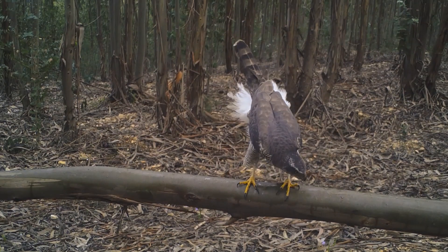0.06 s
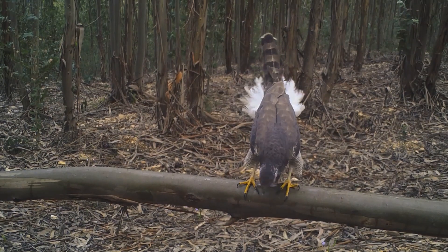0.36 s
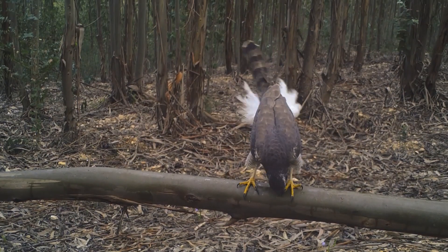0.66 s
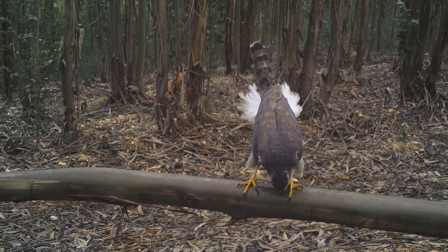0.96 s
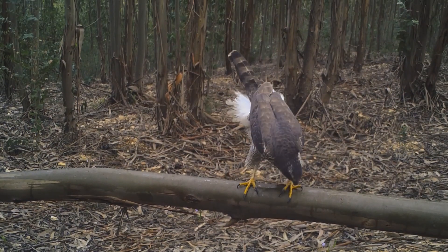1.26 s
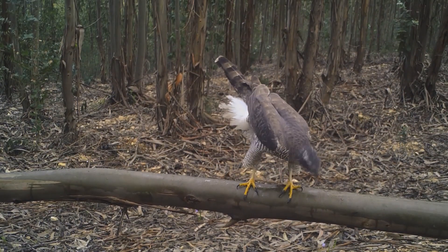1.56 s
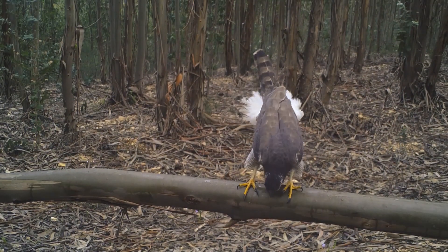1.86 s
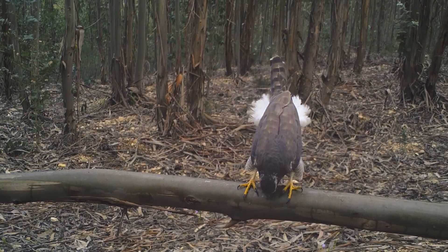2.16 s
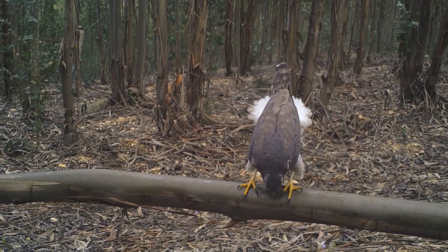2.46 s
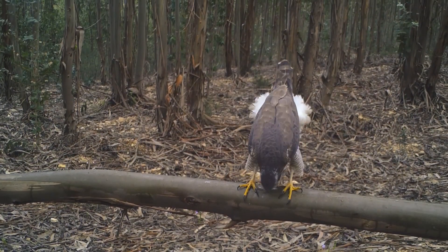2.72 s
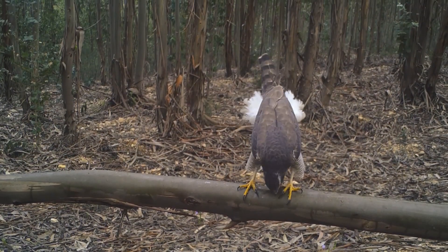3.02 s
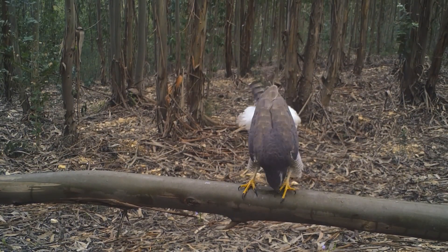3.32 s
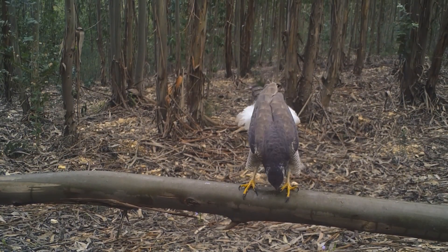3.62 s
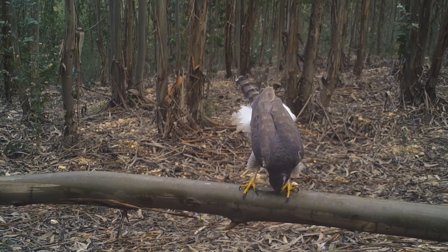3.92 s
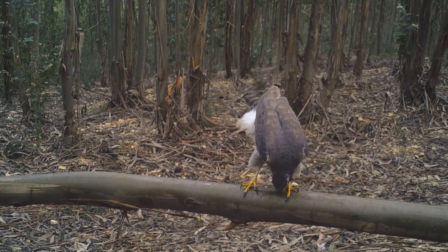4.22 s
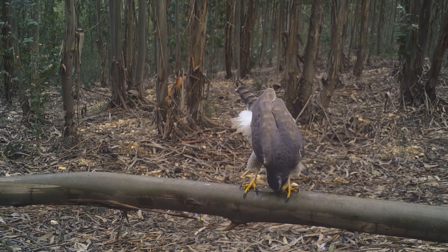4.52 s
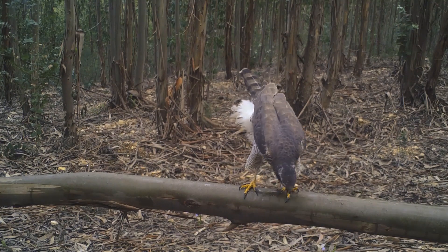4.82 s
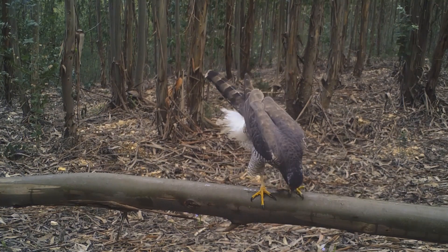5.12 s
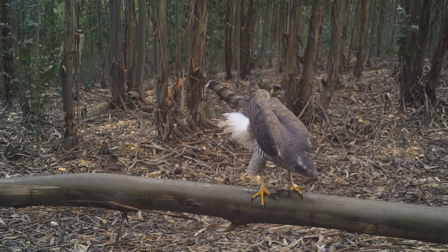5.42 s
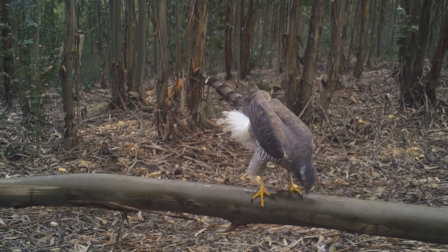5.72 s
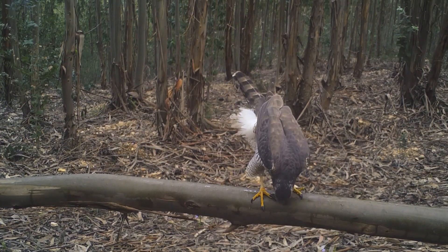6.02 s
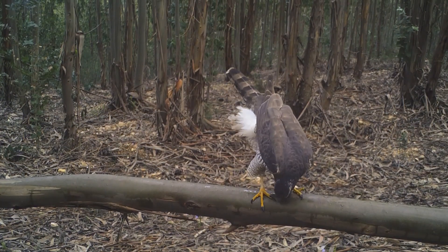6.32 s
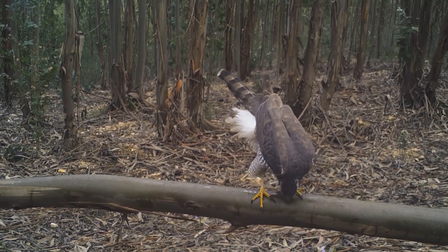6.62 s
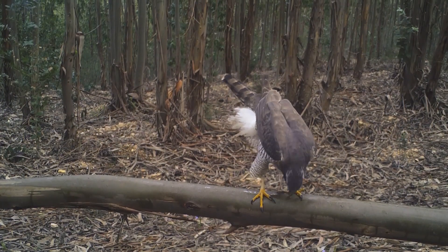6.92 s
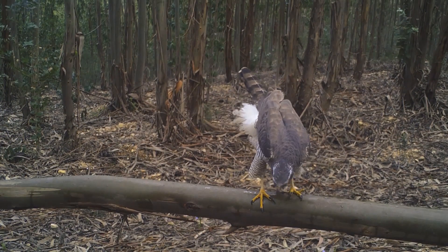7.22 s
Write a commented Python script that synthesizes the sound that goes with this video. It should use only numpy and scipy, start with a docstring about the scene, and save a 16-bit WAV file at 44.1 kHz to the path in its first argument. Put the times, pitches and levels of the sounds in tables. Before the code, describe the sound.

Shrill rising hawk calls, one cracking, give way to soft, widely spaced chirps and light leaf ticks in quiet woodland.

```python
"""A goshawk calls in a wood: drawn-out rising wails, one cracking into two pitches, and short falling notes.
Its syrinx makes a stack of harmonics, filtered by the resonances of throat and beak.
Trunks reflect the voice and the wood rings faintly. Dry leaf litter ticks and a small bird
whistles far off, over a low outdoor rumble and a faint hiss."""
import sys
import numpy as np
from scipy import signal
from scipy.fft import rfft, irfft
from scipy.io import wavfile

SR = 44100
rng = np.random.default_rng(int(sys.argv[2]) if len(sys.argv) > 2 else 0)


def bounce(signal):
    """Save signal as a 16-bit WAV file at the path given by the first command-line argument."""
    frames = np.transpose(np.atleast_2d(signal))
    limited = np.clip(frames, -1, 1)
    pcm = np.round(limited * 32767).astype(np.int16)
    wavfile.write(sys.argv[1], SR, pcm)


N = 325017
LEAD = SR // 4   # samples ahead of time zero, where the first wail begins


def from_db(db):
    """Amplitude ratio of a level in decibels."""
    return 10 ** (np.asarray(db) / 20)


def rms_one(x):
    """Normalisation to unit rms."""
    return x / np.sqrt(np.mean(x ** 2) + 1e-20)


def at_hz(spectrum, hz):
    """Interpolation of a spectrum on a logarithmic frequency axis."""
    points_hz, db = np.transpose(spectrum)
    return np.interp(np.log(np.maximum(hz, 1)), np.log(points_hz), db)


def resonance(hz, centre_hz, half_width_hz):
    """Lorentzian resonance curve of unit height."""
    return 1 / (1 + ((hz - centre_hz) / half_width_hz) ** 2)


def coloured_noise(spectrum, size):
    """Spectral shaping of white noise, at unit rms."""
    hz = np.arange(size // 2 + 1) * SR / size
    return rms_one(irfft(rfft(rng.standard_normal(size)) * from_db(at_hz(spectrum, hz)), size))


def waver(hz, size):
    """Random modulation: low-passed noise of unit rms."""
    low_pass = signal.butter(2, hz, fs=SR, output="sos")
    return rms_one(signal.sosfilt(low_pass, rng.standard_normal(size + SR // 2)))[-size:]


def phase_of(hz):
    """Phase in radians is the integral of angular frequency."""
    return 2 * np.pi * np.cumsum(hz) / SR


def follow(rows):
    """Linear interpolation of timed rows: sample indices, a 2 ms fade at each end, and the curves."""
    s, *columns = np.transpose(rows)
    at = np.arange(int(s[0] * SR), int(s[-1] * SR))
    fade = np.minimum(np.minimum(at - at[0], at[-1] - at) / (.002 * SR), 1)
    return at, fade, [np.interp(at / SR, s, column) for column in columns]


def place(sound, at):
    """A sound set on the time line at the given samples."""
    out = np.zeros(LEAD + N)
    out[LEAD + at] = sound
    return out


def outdoor_air(level_db=-50.5):
    """Stationary noise whose density falls from a low rumble to a faint hiss."""
    # Each row: frequency in Hz, relative spectral density in dB.
    spectrum = [(8.8, -24), (15, 2.5), (30, -2.5), (101, -12), (189, -17.5), (343, -23.5), (385, -25),
                (497, -27.5), (741, -31.5), (1130, -36), (1430, -38.5), (1950, -40.5), (2310, -41),
                (3070, -45), (13500, -53.5)]
    return from_db(level_db) * coloured_noise(spectrum, N)


def wood_echo(x, tail_db=-27.5, t60_s=0.71, dull_hz=9060, build_s=0.026):
    """Convolution with reflections from ground and trunks and a decaying tail of diffuse scatter."""
    # Each row: delay in seconds, gain in dB.
    reflections = [(.0031, -21), (0.0102, -13), (.034, -25.5), (0.057, -29.5), (0.074, -40), (0.107, -39)]
    t = np.arange(SR) / SR
    scatter = signal.sosfilt(signal.butter(2, dull_hz, fs=SR, output="sos"), rng.standard_normal(SR))
    scatter *= from_db(-60 * t / t60_s) * (1 - np.exp(-t / build_s))
    response = from_db(tail_db) * scatter / np.sqrt(np.sum(scatter ** 2))
    for delay_s, db in reflections:
        response[int(delay_s * SR)] += from_db(db)
    return signal.fftconvolve(x, response)[:len(x)]


def far_bird(jitter=0.0049, jitter_hz=60):
    """A thin whistle: a sinusoid under slight random frequency modulation."""
    # Each row: time in seconds, pitch in Hz, level in dB.
    whistle = [(5.295, 4500, -76), (5.315, 4420, -79), (5.355, 4480, -72), (5.39, 4460, -88),
               (5.47, 4390, -78), (5.54, 4530, -90)]
    at, fade, (pitch, level_db) = follow(whistle)
    tone = np.sqrt(2) * np.sin(phase_of(pitch * (1 + jitter * waver(jitter_hz, len(at)))))
    return place(tone * fade * from_db(level_db), at)


def leaf_litter(snap_s=0.00029, crumble_s=0.0088, crumble_db=-18):
    """Impulsive excitation: a dry snap and a brief crumble drive two heavily damped modes."""
    # Each row: start in seconds, peak level in dB, gain of the crunch mode in dB.
    ticks = [(1.209, -47.5, -2), (1.7754, -42, -8), (2.291, -54.5, -0.5), (3.063, -55.5, 8),
             (3.2577, -53, 12), (3.3013, -53, 8.5), (4.182, -43.5, -8), (4.4455, -47, -8), (6.12, -53, -2)]
    # Each row: frequency in Hz, bandwidth in Hz. The low crunch comes first, then the snap.
    modes = [(1900, 1900), (6700, 1400)]
    resonators = [signal.iirpeak(hz, hz / width, fs=SR) for hz, width in modes]
    t, out = np.arange(SR // 20) / SR, 0
    envelope = np.exp(-t / snap_s) + from_db(crumble_db) * np.exp(-t / crumble_s)
    for start, peak_db, crunch_db in ticks:
        force = rng.standard_normal(len(t)) * envelope
        crunch, snap = [signal.lfilter(b, a, signal.lfilter(b, a, force)) for b, a in resonators]
        tick = snap + from_db(crunch_db) * crunch
        out += place(from_db(peak_db) * tick / np.abs(tick).max(), int(start * SR) + np.arange(len(t)))
    return out


def rasp(phase):
    """Turbulence noise, coloured by the throat and amplitude-modulated once a cycle."""
    # Each row: frequency in Hz, relative spectral density in dB.
    spectrum = [(500, -33), (1500, -29), (2500, -9), (3700, 6), (5200, 5.5), (8000, -3.5), (13000, -38)]
    return coloured_noise(spectrum, len(phase)) * (1 + 0.72 * np.cos(phase))


def hawk_voice(rows, throat, flutter_db, flutter_hz, shrill_hz, shrill_half_width_hz,
               jitter=0.071, shimmer=0.21, rough_hz=500, rasp_db=-11.5, wobble=.003, wobble_db=0.76):
    """Source and filter: harmonics of the syrinx, weighted by the resonances of throat and beak."""
    at, fade, (pitch, level_db, beak_hz, bright_db, shrill_db, rough) = follow(rows)
    rough, size = np.clip(rough, 0, 1), len(at)
    # unsteady air pressure moves pitch and level together
    pressure = waver(40, size)
    pitch, level_db = pitch * (1 + wobble * pressure), level_db + wobble_db * pressure
    phase = phase_of(pitch * (1 + jitter * rough * waver(rough_hz, size)))
    k = np.arange(1, 15)[:, None]   # harmonic numbers
    hz = k * pitch
    # brightness tilts the first two octaves of the stack
    colour_db = at_hz(throat, hz) + bright_db * np.minimum(np.log2(k), 2)
    # the beak sets one resonance and opens or shades a shrill one above it
    colour_db += 10 * resonance(hz, beak_hz, half_width_hz=600)
    colour_db += shrill_db * resonance(hz, shrill_hz, shrill_half_width_hz)
    # short wavelengths flutter most as the head moves
    colour_db += flutter_db * np.minimum(hz / 4000, 2) * np.array([waver(flutter_hz, size) for _ in k])
    gains = from_db(colour_db)
    lags = rng.uniform(0, 2 * np.pi, k.shape)
    tone = np.sum(gains * np.cos(k * phase - lags), axis=0) / np.sqrt(np.sum(gains ** 2, axis=0) / 2)
    voice = tone * (1 + shimmer * rough * waver(rough_hz, size)) + from_db(rasp_db) * rough * rasp(phase)
    return place(voice * fade * from_db(level_db), at)


def hawk_notes(top_s=0.0097, slide_s=.028, release_s=0.014, edge_db=14):
    """Downward frequency glides: after a bright onset each note sags, dulls and roughens."""
    # Each row: start, attack and length in seconds, top and end pitch in Hz, base level in dB, beak
    # resonance in Hz, then base values of brightness in dB per octave, shrillness in dB, roughness 0-1.
    notes = [(0.528, .004, 0.049, 951, 812, -39, 2850, -1.5, -4, .18),
             (3.631, 0.018, 0.058, 958, 808, -39, 2380, -0.5, -6, 0.02),
             (5.101, .004, 0.05, 964, 824, -38.5, 2940, 0.4, 0, 0.06),
             (6.486, 0.0043, 0.053, 1004, 831, -36.5, 2670, 0, 1.5, .08)]
    # Each row: frequency in Hz, relative gain of the throat in dB.
    throat = [(800, -3), (1000, -12), (1250, -8), (1900, 2), (2400, 12.5), (3000, -4), (3600, -0.5),
              (4200, -11.5), (4900, -4.5), (5900, -27), (7000, -23.5), (8500, -40.5), (10500, -33.5),
              (12500, -40)]
    # Offsets to level, brightness, shrillness and roughness at the two ends of the slide.
    at_top, at_end = (-1, 1.5, 5.5, 0), (-5, -6.5, -7.5, 0.23)
    out = 0
    for start, attack_s, length_s, top_hz, end_hz, level_db, beak_hz, bright_db, shrill_db, rough in notes:
        t = np.linspace(0, length_s + release_s, 200)
        slide = 1 - np.exp(-((t - top_s) / slide_s) ** 2)
        edges = np.maximum(1 - t / attack_s, 0) + np.maximum(t - length_s, 0) / release_s
        sag_db, tilt_db, shade_db, husk = [top + (end - top) * slide for top, end in zip(at_top, at_end)]
        pitch = top_hz + (end_hz - top_hz) * slide
        envelope_db = level_db + sag_db - edge_db * edges
        timbre = beak_hz, bright_db + tilt_db, shrill_db + shade_db, rough + husk
        rows = np.column_stack(np.broadcast_arrays(start + t, pitch, envelope_db, *timbre))
        out += hawk_voice(rows, throat, flutter_db=3, flutter_hz=55.6,
                          shrill_hz=5000, shrill_half_width_hz=900)
    return out


def hawk_crack(lower_jitter=0.076, upper_jitter=.012, rough_hz=300, shimmer=.4, rasp_db=-17):
    """Biphonation: the two sides of the syrinx fall out of step and make sum and difference tones."""
    # Each row: time in seconds, lower and upper pitch in Hz, level in dB.
    contour = [(.412, 1240, 2350, -39.5), (.417, 1318, 2259, -29), (.432, 1385, 2301, -31.5),
               (.456, 1346, 2244, -30.5), (.467, 1376, 2200, -38), (.472, 1305, 2200, -43)]
    # Each row: multiple of the lower pitch, multiple of the upper pitch; their sum is one tone.
    multiples = [(1, 0), (0, 1), (2, 0), (-1, 2), (1, 1), (0, 2), (2, 1), (-1, 3), (1, 2), (0, 3), (1, 3),
                 (0, 4), (2, 3), (1, 4)]
    # Each entry: relative level of the matching tone in dB.
    tone_db = [-14, 3, -15, -11, -1.5, -8.5, -13, -29, -20, -22.5, -28.5, -31, -39, -26]
    at, fade, (lower_hz, upper_hz, level_db) = follow(contour)
    size = len(at)
    lower = phase_of(lower_hz * (1 + lower_jitter * waver(rough_hz, size)))
    upper = phase_of(upper_hz * (1 + upper_jitter * waver(rough_hz, size)))
    tones = 0
    for (m, n), db in zip(multiples, tone_db):
        flicker = 1 + shimmer * abs(m) * waver(rough_hz, size)
        tones += from_db(db) * np.cos(m * lower + n * upper) * flicker
    voice = rms_one(tones) + from_db(rasp_db) * rasp(upper)
    return place(voice * fade * from_db(level_db), at)


def wail_timbre(s, pitch, level_db, beak_hz, bright_db, shrill_db, rough,
                full_voice_db=-38.5, shrill_pivot_db=-29):
    """Level-dependent timbre: a wail is dull when soft, shrill when loud."""
    soft_db = np.maximum(full_voice_db - level_db, 0)
    bright_db = bright_db - 0.27 * soft_db
    shrill_db = shrill_db + 2.04 * (level_db - shrill_pivot_db)
    rough = rough * from_db(0.1 * soft_db)
    return np.column_stack(np.broadcast_arrays(s, pitch, level_db, beak_hz, bright_db, shrill_db, rough))


def wail_arch(start, rise_s, length_s, release_s, start_hz, crest_hz, crest_db, swell_db, lateness,
              beak_hz, bright_db, shrill_db, rough):
    """Vocal effort couples pitch and level: both rise in an arch, then drop as the voice roughens."""
    fall_octaves_per_s, fall_db, rough_per_s = 18, 21.5, 33
    t = np.linspace(0, length_s + release_s, 200)
    effort = 1 - (1 - (np.minimum(t, length_s) / rise_s) ** lateness) ** 2
    released_s = np.maximum(t - length_s, 0)
    pitch = (start_hz + (crest_hz - start_hz) * effort) * 2 ** (-fall_octaves_per_s * released_s)
    soft_onset_db = 3.5 * np.maximum(1 - t / (.11 * rise_s), 0)
    level_db = crest_db - swell_db * (1 - effort) - soft_onset_db - fall_db * released_s / release_s
    rough = rough + rough_per_s * released_s
    return wail_timbre(start + t, pitch, level_db, beak_hz, bright_db, shrill_db, rough)


def hawk_wails():
    """Upward frequency glides sweep the harmonics through the resonances of throat and beak."""
    # The wail that climbs until it cracks. Each row: time in seconds, pitch in Hz, level in dB.
    climb = [(0.203, 796.9, -57.5), (0.221, 916.6, -52.5), (0.249, 989.1, -47), (0.273, 1000, -46.5),
             (0.285, 896.7, -39), (0.345, 1002, -36.5), (0.365, 1133, -33.5), (0.375, 1152, -28),
             (0.399, 1263, -29), (0.411, 1284, -31.5)]
    # Each row: start, rise, length and release in seconds, start and crest pitch in Hz, crest level and
    # swell in dB, lateness of the rise (1 is none), beak resonance in Hz, then base values of brightness
    # in dB per octave, shrillness in dB, roughness 0-1. In row two the voice catches after the crack.
    wails = [(-.16, .14, .166, 0.024, 1237, 1284, -26.5, 14, 1.6, 2920, 0, 1.5, .16),
             (.466, 0.0083, 0.021, .018, 1175, 1179, -31, 5, .2, 3332, -1.5, 0, .12),
             (0.716, .228, .287, 0.024, 775, 1182, -28, 25, 1.1, 3266, -0.24, 6.5, 0.079),
             (1.272, 0.18, .209, 0.013, 784, 953.8, -37, 19, 1.66, 3460, -1, 4, .03)]
    # Each row: frequency in Hz, relative gain of the throat in dB.
    throat = [(800, -5.5), (1000, -9.5), (1250, -9.5), (1900, -5.5), (2400, -2), (3000, -6.5), (3600, -2.2),
              (4200, -7), (4900, -9.5), (5900, -12.5), (7000, -17), (8500, -24), (10500, -32),
              (12500, -49.5)]
    contours = [wail_timbre(*np.transpose(climb), beak_hz=3450, bright_db=0.5, shrill_db=6.5, rough=.17)]
    contours += [wail_arch(*row) for row in wails]
    return sum(hawk_voice(rows, throat, flutter_db=2.4, flutter_hz=35,
                          shrill_hz=4750, shrill_half_width_hz=600) for rows in contours)


def scene():
    """Superposition of the direct sounds, their echoes and the steady background, in mono."""
    direct = hawk_wails() + hawk_crack() + hawk_notes() + leaf_litter() + far_bird()
    among_trees = direct + wood_echo(direct)
    return (among_trees[LEAD:] + outdoor_air())[None]


def record(dry):
    """Band limiting: a steep elliptic low-pass removes the treble above 14 kHz."""
    return signal.sosfilt(signal.ellip(12, .1, 70, 14000, fs=SR, output="sos"), dry)


dry = scene()
out = record(dry)
bounce(out)
```